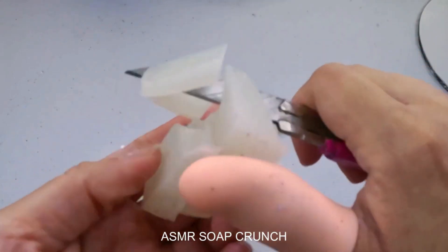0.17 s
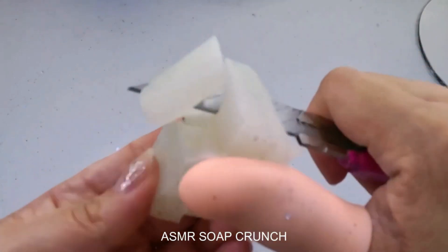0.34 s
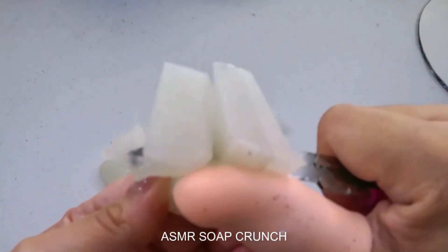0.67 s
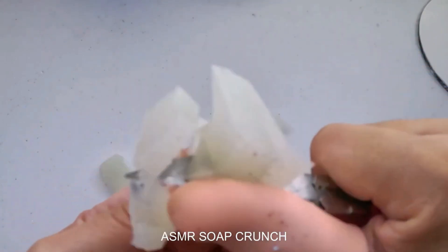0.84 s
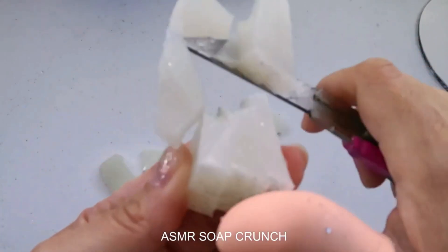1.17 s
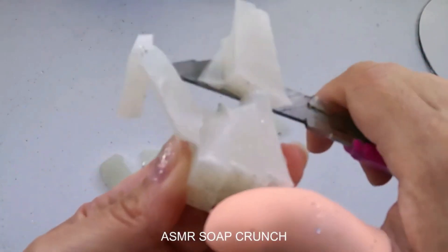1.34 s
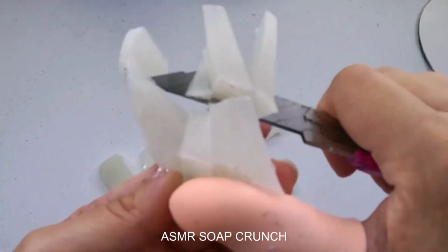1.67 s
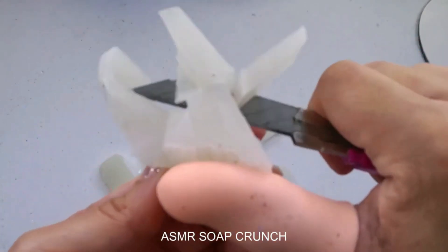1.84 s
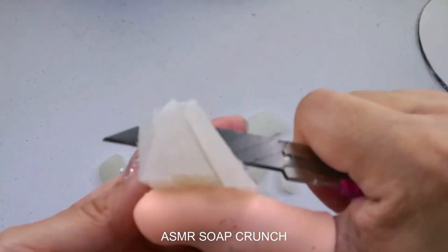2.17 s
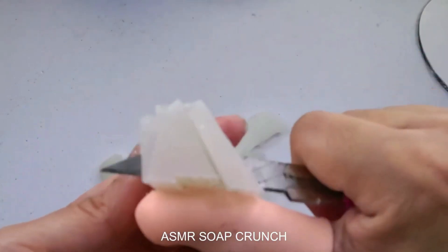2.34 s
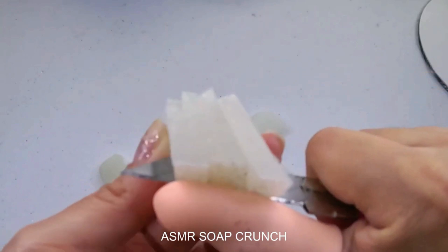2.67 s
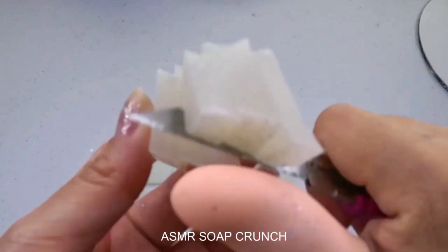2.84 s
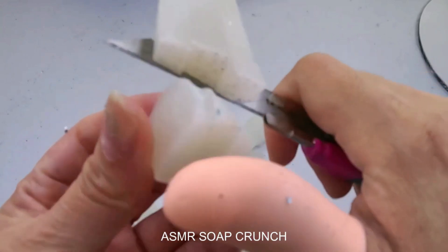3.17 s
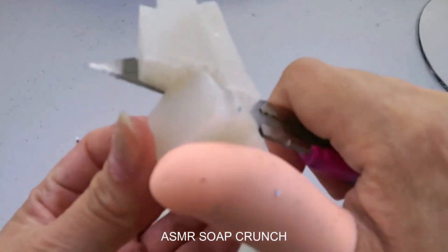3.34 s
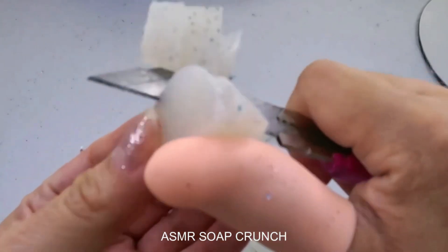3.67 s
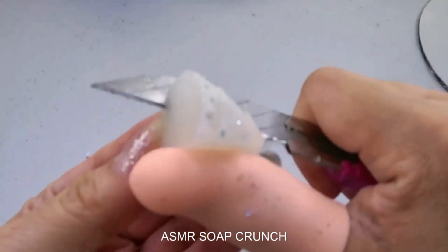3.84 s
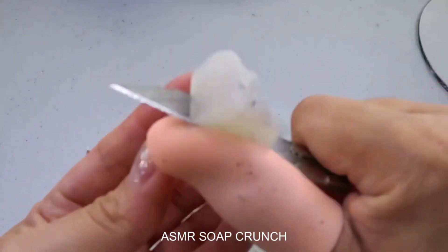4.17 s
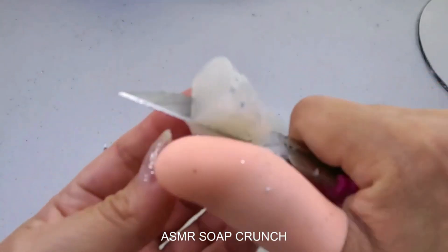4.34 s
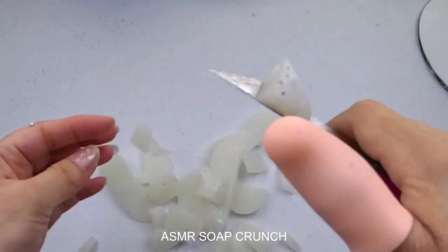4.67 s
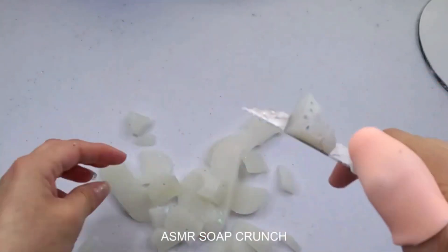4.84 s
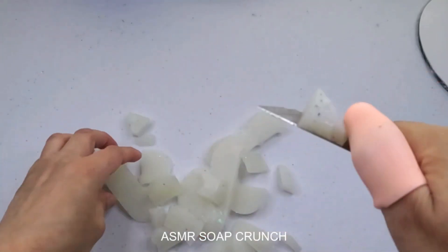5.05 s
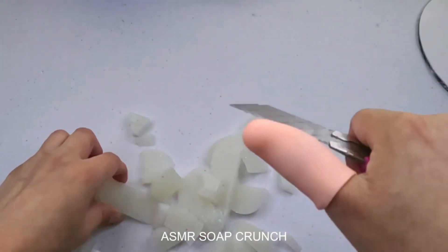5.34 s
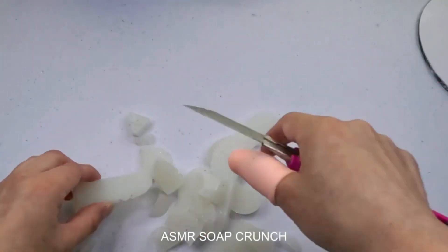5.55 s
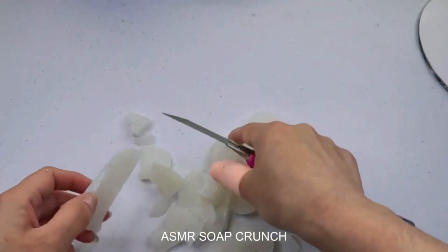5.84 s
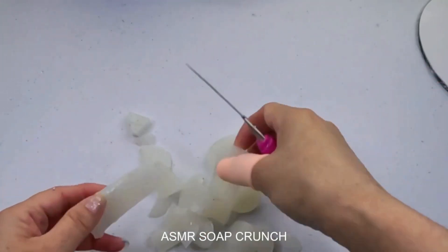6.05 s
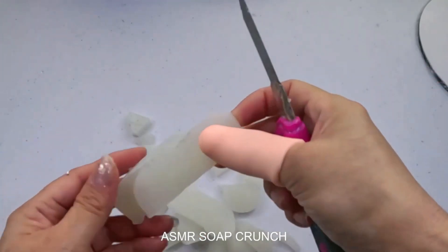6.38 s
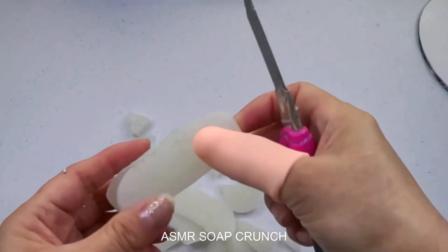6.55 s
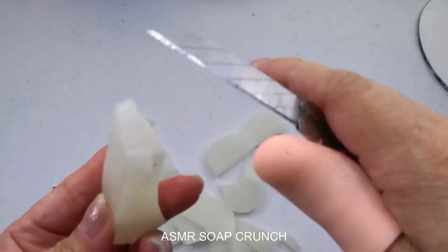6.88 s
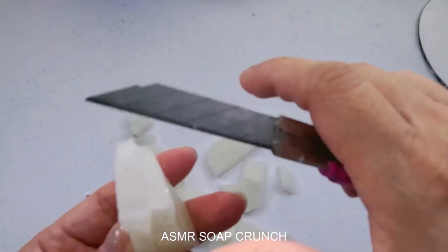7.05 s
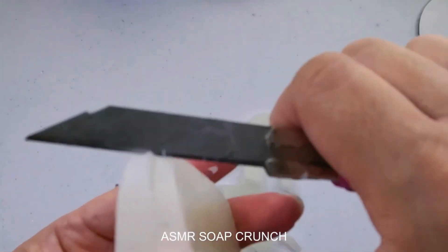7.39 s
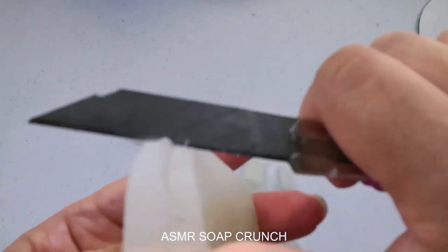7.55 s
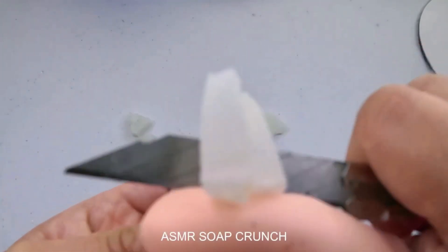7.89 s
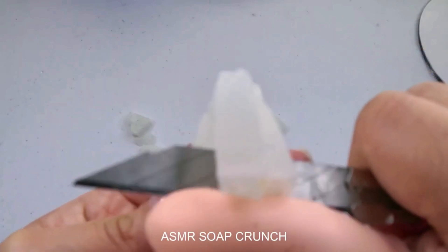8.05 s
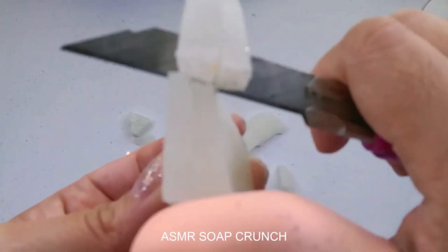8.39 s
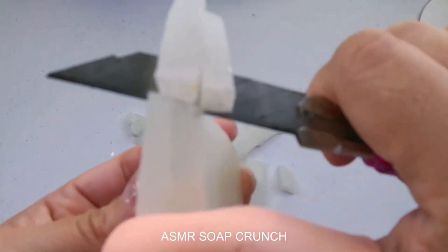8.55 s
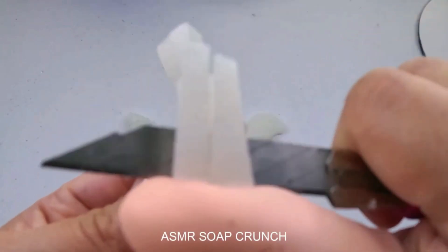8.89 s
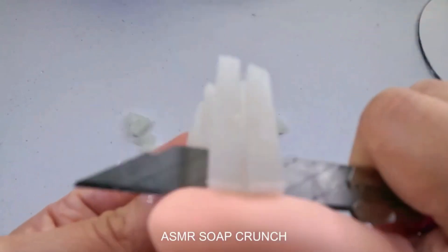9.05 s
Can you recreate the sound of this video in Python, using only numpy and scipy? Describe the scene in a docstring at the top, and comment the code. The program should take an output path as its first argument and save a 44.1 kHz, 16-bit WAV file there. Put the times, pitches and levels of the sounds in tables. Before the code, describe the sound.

Crisp snaps and rasps of a blade cutting soap, with pieces thudding and bouncing on a table while engines drone outside.

```python
"""Traffic rumbles and engines hum and beat outside a small room; a heavier vehicle passes with a dull roar.
Close to the microphone, a craft knife rustles and crackles through soft soap as slivers snap off.
Cut pieces drop on the table with a knock, a boom and a few bounces, and a hand shoves them over the top.
The table sways under the arms, and a faint electrical whine sits in the hiss.
Loud knocks overload the recorder and pull its gain down for a moment."""
import sys
import numpy as np
from scipy import signal
from scipy.fft import rfft, irfft
from scipy.io import wavfile
from scipy.ndimage import uniform_filter1d

SR = 44100
rng = np.random.default_rng(int(sys.argv[2]) if len(sys.argv) > 2 else 0)


def persist_wave(psi):
    """Save psi, clipped to +-1, as 16-bit WAV."""
    counts = np.round(np.clip(psi, -1, 1) * 32767).astype(np.int16)
    wavfile.write(sys.argv[1], SR, np.atleast_2d(counts).T)


N = 406602
TIME = np.arange(N) / SR
HIT_TIME = TIME[:SR // 3]


def from_db(db):
    """Decibels to gain."""
    return 10 ** (np.asarray(db) / 20)

def unit_power(x):
    """Scale to an RMS of one."""
    return x / np.sqrt(np.mean(x ** 2) + 1e-20)

def automation(rows):
    """The columns of a breakpoint curve at every sample."""
    times, *columns = np.transpose(rows)
    return [np.interp(TIME, times, column) for column in columns]

def at_hz(points, hz, column=1):
    """Read a column on a log-frequency axis."""
    points = np.array(points)
    return np.interp(np.log(hz), np.log(points[:, 0]), points[:, column])

def colour(x, spectrum):
    """Causal EQ of unit energy: the spectrum sets only the shape, falling 24 dB an octave past its ends."""
    size = 8192
    hz = np.maximum(np.fft.rfftfreq(size, 1 / SR), 1)
    octaves_outside = np.log2(np.maximum(1, np.maximum(spectrum[0][0] / hz, hz / spectrum[-1][0])))
    cepstrum = irfft(np.log(from_db(at_hz(spectrum, hz) - 24 * octaves_outside)))
    kernel = irfft(np.exp(rfft(2 * cepstrum[:size // 2], size)))[:size // 2]
    return signal.oaconvolve(x, kernel / np.linalg.norm(kernel))[:len(x)]

def shifted(spectrum, ratio):
    """The same spectrum at another pitch."""
    return [(hz * ratio, db) for hz, db in spectrum]

def noise(spectrum):
    """Coloured noise of unit power."""
    return colour(rng.standard_normal(N), spectrum)

def drift(rate_hz):
    """Slow random modulation of unit power."""
    hop, settle = 40, 2000
    pole = np.exp(-2 * np.pi * rate_hz * hop / SR)
    white = rng.standard_normal(N // hop + settle + 2)
    slow = signal.lfilter([1], [1, -2 * pole, pole * pole], white)[settle:]
    return np.interp(np.arange(N) / hop, np.arange(len(slow)), unit_power(slow))

def swell(s, half_s):
    """A rise and fall around time s, at half height half_s to either side."""
    return 1 / (1 + ((TIME - s) / half_s) ** 2)

def gate(start, end, attack_s, release_s):
    """One between start and end, with straight fades outside."""
    return np.clip(1 + np.minimum((TIME - start) / attack_s, (end - TIME) / release_s), 0, 1)

def add(track, s, sound):
    """Mix a sound into a track at time s."""
    start = max(round(s * SR), 0)
    track[start:start + len(sound)] += sound[:N - start]


# EQ of the road rumble, the tyre wash and the microphone hiss: f/Hz, level/dB
RUMBLE_EQ = [(70, -10.5), (90, 5), (130, 10), (190, 3.5), (245, 3), (320, -8), (385, -9), (440, -14.5),
             (520, -18.5), (700, -27), (1100, -45.5)]
WASH_EQ = [(450, 6.5), (750, -6), (1050, 8.5), (1600, 3.5), (2100, -9), (2800, -20), (4000, -44)]
HISS_EQ = [(1500, 16), (3000, 4.5), (5000, 1.5), (7200, 5.5), (8500, -3.5), (10000, -3), (12000, -14.5),
           (16000, -21.5)]
# fader rides on the rumble and on the hiss, which rises at the outset: t/s, relative level/dB
RUMBLE_RIDE = [(0, -34.5), (.65, -31), (2.2, -31), (2.7, -33.5), (3.3, -32.5), (3.9, -29.5), (4.6, -32.5),
               (6.9, -37), (7.7, -34.5), (9.2, -33.5)]
HISS_RIDE = [(0, -3.5), (0.5, 0)]
# tones wavering in the rumble: f/Hz, level/dB relative to its ride
DRONE_TONES = [(95, -27.5), (187, -11), (250, -3.5), (313, -7), (379, -15.5), (500, -23.5)]
# passing cars: closest t/s, half length/s, level/dB before trim
CAR_PASSES = [(1.714, 0.43, -47.5), (3.709, 1, -54.5), (5.185, 1, -53), (7.413, 0.87, -53),
              (8.49, 0.78, -56)]

def traffic_and_hiss(rumble_trim_db=3.5, wash_trim_db=2, far_road_db=-59, hiss_db=-60):
    """The bed: droning traffic rumble, tyre wash that swells with each car, and microphone hiss."""
    rumble_ride, = automation(RUMBLE_RIDE)
    hiss_ride, = automation(HISS_RIDE)
    car_power = sum((from_db(db) * swell(s, half)) ** 2 for s, half, db in CAR_PASSES)
    wash_gain = from_db(wash_trim_db) * np.sqrt(from_db(far_road_db) ** 2 + car_power)
    rumble = from_db(rumble_trim_db) * noise(RUMBLE_EQ)
    for hz, db in DRONE_TONES:
        phase = 2 * np.pi * hz * TIME
        rumble += from_db(db) * (drift(2.88) * np.sin(phase) + drift(7.55) * np.cos(phase))
    wash = wash_gain * noise(WASH_EQ)
    hiss = from_db(hiss_db + hiss_ride) * noise(HISS_EQ)
    return from_db(rumble_ride) * rumble + wash + hiss


# engines outside, one curve each: t/s, f/Hz, level/dB before trim
ENGINE_CURVES = [
    [(0, 122, -51), (1.3, 123.5, -21.5), (1.8, 116.9, -27.5), (2.2, 118.3, -17.5), (2.7, 119.9, -25.5),
     (3.2, 113.8, -19.5), (3.85, 113.8, -18.5), (5.4, 107.5, -25.5), (5.9, 126, -29), (6.4, 124.5, -28)],
    [(6.7, 131.5, -16), (7.3, 127.7, -43), (8, 124.6, -32), (8.7, 124.9, -31.5), (8.93, 123.6, -18.5),
     (9.2, 120.8, -35.5)],
    [(6.7, 125.3, -27.5), (7.7, 119.3, -27), (8.7, 109.6, -41)],
    [(.15, 139, -26), (2.2, 140.8, -30.5), (5.6, 139.7, -36.5)],
]

def engines(trim_db=-1, waver=0.21, fade_s=0.11):
    """Each engine is a low wavering hum; close pitches beat against each other."""
    out = np.zeros(N)
    for curve in ENGINE_CURVES:
        hz, db = automation(curve)
        start, end = curve[0][0], curve[-1][0]
        phase = 2 * np.pi * (np.cumsum(hz) / SR - hz[0] * start)
        hum = (1 + waver * drift(21)) * np.sin(phase) + waver * drift(5.6) * np.cos(phase)
        out += gate(start + fade_s, end, fade_s, fade_s) * from_db(db + trim_db) * np.sqrt(2) * hum
    return out


# sub-bass EQ of the swaying table: f/Hz, level/dB
SWAY_EQ = [(20, -5), (28, -10), (32.5, 3), (38, -13.5), (47, 3), (62, 5.5), (80, -7.5)]
# arms jolting the table: t/s, level/dB
TABLE_JOLTS = [(4.001, -13), (5.326, -17.5), (8.199, -24)]

def table_sway(sway_db=-36, rock_hz=30.7, rock_t60_s=1.6):
    """The table sways steadily under the arms and rocks for a moment after a jolt."""
    out = from_db(sway_db) * noise(SWAY_EQ)
    t = TIME[:2 * SR]
    for s, db in TABLE_JOLTS:
        add(out, s, from_db(db - 60 * t / rock_t60_s) * np.sin(2 * np.pi * rock_hz * t))
    return out


# partials of the whine: f/Hz, level/dB
WHINE_TONES = [(4934, -80.5), (5618, -76), (5917, -80), (7018, -77), (7591, -80.5)]

def electrical_whine():
    """Thin steady tones just above the hiss."""
    return sum(from_db(db) * np.sin(2 * np.pi * hz * TIME) for hz, db in WHINE_TONES)


# EQ of the heavier vehicle: f/Hz, level/dB
ROAR_EQ = [(330, -7.5), (450, 1.5), (540, 1.5), (680, -13.5)]

def vehicle_roar(closest_s=1.6, half_s=0.88, peak_db=-47):
    """A dull roar swells and fades as the vehicle goes by."""
    return from_db(peak_db) * swell(closest_s, half_s) * noise(ROAR_EQ)


def fracture(burst_db, burst_t60, crumb_db, crumb_t60, split_db, attack_s=0.0011):
    """A crack grows, splits through in one click, and leaves a short burst and a ragged tail of crumbs."""
    t = HIT_TIME
    burst, crumbs = rng.standard_normal((2, len(t)))
    clumps = unit_power(uniform_filter1d(rng.standard_normal(len(t)), size=90) ** 2)
    burst *= from_db(burst_db - 60 * t / burst_t60)
    crumbs *= clumps * from_db(crumb_db - 60 * t / crumb_t60)
    out = (burst + crumbs) * np.minimum(t / attack_s, 1)
    out[round(attack_s * SR)] += from_db(split_db)
    return out


# EQ of a snapping edge and of a chip's body: f/Hz, level/dB
EDGE_EQ = [(3000, -21), (5000, -0.5), (7500, 8), (9500, 10.5), (12000, -5.5), (16000, -17.5)]
CHIP_EQ = [(900, -23), (1500, 1.5), (2300, -6), (3100, 1.5), (4000, -9), (5000, -6.5), (7000, -15.5)]
# soap snapping: t/s, edge and body level/dB before trim, crumbs relative level/dB, edge f/Hz, body f/Hz
SOAP_SNAPS = [(0.167, -47, -58, -19, 9000, 3300), (0.9447, -22.5, -43, -23, 9200, 3300),
              (0.982, -36, -47, -22, 8500, 4600), (1.13, -36, -57, -24, 9500, 3000),
              (1.142, -42, -58, -21, 9350, 3000), (1.219, -51, -32.5, -25, 7500, 3500),
              (1.427, -50, -46, -22, 7000, 3300), (1.571, -32.5, -31, -25, 8100, 3080),
              (1.8397, -32.5, -40, -22, 8900, 3400), (1.898, -36, -46, -17, 8700, 2900),
              (2.7739, -25, -58, -30, 9100, 2960), (2.78, -29, -65, -24, 8500, 3040),
              (2.8038, -20, -32, -19.5, 8400, 2680), (2.834, -39, -42, -23, 7800, 2600),
              (2.974, -31.5, -45, -15, 8900, 2400), (3.3116, -47, -34, -13.5, 8800, 2640),
              (3.349, -56, -42, -17, 7000, 3080), (3.712, -40, -70, -17, 9000, 3000),
              (4.324, -29, -41, -17, 8600, 2980), (4.3754, -12.5, -15.5, -44, 7200, 4640),
              (4.4554, -46, -38, -23, 7500, 2990), (4.4798, -36, -41.5, -25, 8250, 3100),
              (4.713, -41.5, -51, -18, 6500, 4970), (4.774, -40, -47, -16.5, 7300, 2770),
              (4.8733, -16, -31, -41, 10000, 3230), (4.8981, -14.5, -11.5, -23, 6430, 3270),
              (5.4763, -39.5, -34.5, -19.5, 6450, 3780), (5.642, -44, -34.5, -19, 6470, 4400),
              (7.0705, -35.5, -52, -16, 8100, 3300), (7.4696, -68, -41.5, -19, 8030, 3194),
              (7.887, -42, -58, -18, 8400, 3200), (8.1461, -34.5, -36.5, -27, 9000, 3172),
              (8.2311, -43, -53, -13, 9000, 3200), (8.311, -30.5, -34, -26, 8530, 2240),
              (8.5652, -45, -39.5, -23, 7460, 3530), (8.879, -45, -56, -13, 9000, 3220),
              (8.997, -38, -33, -32, 6400, 3470), (9.2, -45, -31, -32, 6500, 3593)]

def soap_snaps(edge_trim_db=-5.5, body_trim_db=1):
    """Slivers break off at the blade: a bright edge over a duller body pitched by size; (s, sound) pairs."""
    mid_edge_hz, mid_chip_hz = 8900, 3100   # a sliver of middle size
    hits = []
    for s, edge_db, body_db, crumb_db, edge_hz, body_hz in SOAP_SNAPS:
        edge = fracture(burst_db=-5, burst_t60=0.023, crumb_db=crumb_db, crumb_t60=0.12, split_db=12.5)
        body = fracture(burst_db=-4.5, burst_t60=0.023, crumb_db=crumb_db + 3, crumb_t60=0.24, split_db=9)
        edge = from_db(edge_db + edge_trim_db) * colour(edge, shifted(EDGE_EQ, edge_hz / mid_edge_hz))
        body = from_db(body_db + body_trim_db) * colour(body, shifted(CHIP_EQ, body_hz / mid_chip_hz))
        hits.append((s, edge + body))
    return hits


def grains(per_s, clump_db):
    """Tiny clicks of uneven size, in clumps; unit power."""
    onsets = rng.random(N) < per_s / SR
    return unit_power(onsets * rng.standard_normal(N) * from_db(clump_db * drift(40)))


# EQ of the blade's bright rasp: f/Hz, level/dB
RASP_EQ = [(1500, 16.5), (2800, -15), (4500, 2.5), (7000, 7.5), (9800, 3.5), (12000, -5), (16000, -10.5)]
# knife strokes: middle t/s, half length/s, rasp level/dB, crumble level/dB before trim
KNIFE_STROKES = [(0.951, 0.014, -45.5, -52), (1.196, 0.062, -53.5, -56), (1.554, 0.033, -62.5, -56),
                 (1.941, 0.15, -59.5, -65), (2.807, 0.017, -47, -55.5), (2.949, 0.01, -52.5, -72),
                 (2.997, 0.011, -56.5, -54), (3.064, 0.02, -59, -61.5), (3.332, 0.012, -59.5, -46.5),
                 (3.717, 0.026, -59, -65), (4.386, 0.021, -50, -45), (4.859, 0.086, -68, -51.5),
                 (5.316, 0.02, -51.5, -38), (5.473, 0.051, -57.5, -49.5), (6.243, 0.0077, -58, -51.5),
                 (6.804, 0.051, -55.5, -60), (7.038, 0.13, -64.5, -68.5), (7.837, 0.12, -66.5, -67.5),
                 (8.27, 0.1, -57.5, -57.5), (8.878, 0.16, -60, -62.5)]

def blade(crumble_trim_db=-1):
    """Each stroke swells and fades: bright grains rasp along the edge, duller ones crumble in the block."""
    rasp_gain, crumble_gain = np.zeros((2, N))
    for s, half_s, rasp_db, crumble_db in KNIFE_STROKES:
        force = swell(s, half_s)
        rasp_gain += from_db(rasp_db) * force
        crumble_gain += from_db(crumble_db + crumble_trim_db) * force
    rasp = colour(grains(per_s=2200, clump_db=2.5), RASP_EQ)
    crumble = colour(grains(per_s=2200, clump_db=2.5), CHIP_EQ)
    return rasp_gain * rasp + crumble_gain * crumble


def strike(modes, spread_db, detune, contact_hz, transpose=1):
    """Each mode's level and pitch vary a little at random from blow to blow; waxy soap dulls the contact."""
    hz, db, t60 = np.transpose(modes)[:, :, None]
    level_offset, pitch_offset = rng.standard_normal((2, len(modes), 1))
    decay = from_db(db + spread_db * level_offset - 60 * HIT_TIME / t60)
    rings = decay * np.sin(2 * np.pi * hz * transpose * (1 + detune * pitch_offset) * HIT_TIME)
    rings[1::3] *= -1   # some modes start in the opposite direction
    return signal.sosfilt(signal.butter(4, contact_hz, fs=SR, output="sos"), rings.sum(axis=0))


# ring of the table top (boom, thud, slap) and of a piece (knock): f/Hz, relative level/dB, t60/s
BOOM_MODES = [(105.5, -10, 0.3), (144, 9, 0.04), (187.4, -4.5, 0.1)]
THUD_MODES = [(235.7, 0, 0.055), (251.7, -2.5, 0.1), (308.7, 0, 0.18), (349.6, 8, 0.022),
              (406, -3.5, 0.076)]
SLAP_MODES = [(496, -0.5, 0.028), (516, -1, 0.015), (643, -6, 0.054), (784, -5, 0.034),
              (1000, -11.5, 0.026), (1040, -10.5, 0.011)]
KNOCK_MODES = [(1340, -13, 0.0056), (1600, -7.5, 0.006), (1822, 3.5, 0.01), (2020, -2.5, 0.0098),
               (2186, -5, 0.0055), (2560, -10, 0.0067), (3000, -9.5, 0.0044), (3580, -12.5, 0.0042)]
# EQ of a piece rocking to rest and of its crack on contact: f/Hz, level/dB
CLATTER_EQ = [(400, -4.5), (700, -11), (1100, 6), (1850, 5), (2500, -7), (3500, -14.5), (4500, -33.5)]
CRACK_EQ = [(2500, 14.5), (4500, 12.5), (7500, 5.5), (10000, -7), (13000, -28.5), (16000, -35.5)]
# landings and bounces: t/s, knock, boom, thud, slap and crack level/dB before trim, knock f/Hz, slap f/Hz
LANDINGS = [(2.278, -23, -6.5, -7, -13, -56, 1760, 1054), (2.2818, -5, -10.5, -7.5, -4, -24, 1850, 631),
            (2.2911, -28, -39, -12.5, -23, -54, 1560, 605), (2.2992, -14, -3.5, -3.5, -33, -25, 1900, 636),
            (2.315, -23, -36, -11, -23, -45, 1700, 810), (2.3503, -11.5, -8, -22, -22, -27.5, 1670, 880),
            (2.367, -18, -25, -19, -12.5, -56, 1750, 710),
            (2.4029, -8.5, -38, -17.5, -13.5, -28, 1980, 1000),
            (3.3123, -45, -37, -38, -33.5, -53, 2070, 760), (3.9987, -17, -0.5, -6.5, -10, -24, 1400, 939),
            (4.02, -36, -6.5, -11, -38, -60, 1610, 614), (4.0354, -5, -32, -6.5, -10.5, -33, 1800, 725),
            (4.325, -43, -19, -13.5, -42, -53, 1910, 500), (4.871, -21, -24, -28, -29, -7.5, 2240, 876),
            (4.874, -11, 0, -6, -17, -21, 1940, 770), (4.8855, -11, -18, -9.5, -13, -31, 1690, 593),
            (4.935, -23, -27, -21.5, -29, -54, 1710, 1020), (4.983, -15, -44, -34, -22, -23, 2110, 730),
            (5.026, -29, -15.5, -13, -14, -43, 2150, 522),
            (5.236, -21.5, -13, -18.5, -27, -27.5, 1940, 600), (5.5291, -34, -35, -38, -48, -55, 1950, 746),
            (5.5597, -3.5, -12.5, -8, -16.5, -16.5, 2176, 703),
            (5.596, -48, -3, -21.5, -45, -62, 1790, 600), (5.618, -20, -14.5, -5, -11.5, -34, 2140, 1140),
            (5.676, -18, -13.5, -5, -17, -32, 1705, 812), (5.688, -31, -19.5, -48, -15, -36, 1715, 677),
            (5.722, -10, -41, -21, -25, -37, 1990, 1210), (6.06, -20.5, -21, -19, -26, -57, 1630, 640),
            (6.072, -37, -34, -27.5, -13.5, -70, 1480, 519), (6.095, -33, -32, -26.5, -21, -66, 1800, 437),
            (6.108, -42, -21, -23, -22, -66, 1820, 527), (6.3389, -38.5, -18.5, -15, -41, -58, 1380, 497),
            (6.3551, -10, -22.5, -15.5, -26.5, -58, 1934, 760), (6.378, -32, -11, -13, -26, -55, 1930, 680),
            (6.403, -14, -14, -4, -10, -19.5, 2450, 688), (6.4413, -1, -24, -7.5, -8, -23, 1890, 940),
            (9.2115, -29, -13, -21, -26, -25.5, 2110, 770)]

def falling_pieces(knock_delay_s=0.0015):
    """A piece cracks on contact, knocks, rocks to rest and sets the table booming; (s, sound) pairs."""
    mid_knock_hz, mid_slap_hz = 1857, 750   # a piece of middle size
    hits = []
    for s, knock_db, boom_db, thud_db, slap_db, crack_db, knock_hz, slap_hz in LANDINGS:
        pitch, slap_pitch = knock_hz / mid_knock_hz, slap_hz / mid_slap_hz
        boom = strike(BOOM_MODES, spread_db=2, detune=0.094, contact_hz=616)
        thud = strike(THUD_MODES, spread_db=2.57, detune=0.0093, contact_hz=690)
        slap = strike(SLAP_MODES, spread_db=2.5, detune=0.072, contact_hz=1664, transpose=slap_pitch)
        knock = strike(KNOCK_MODES, spread_db=3, detune=0.014, contact_hz=3420, transpose=pitch)
        clatter = fracture(burst_db=1, burst_t60=0.042, crumb_db=-3, crumb_t60=0.091, split_db=17)
        crack = fracture(burst_db=-4, burst_t60=0.013, crumb_db=-29, crumb_t60=0.051, split_db=5.5)
        # mix the layers, each with its own trim in dB
        table = from_db(boom_db + 1.5) * boom + from_db(thud_db - 1) * thud + from_db(slap_db + 4) * slap
        piece = (from_db(knock_db - 1.5) * knock
                 + from_db(knock_db - 9) * colour(clatter, shifted(CLATTER_EQ, pitch))
                 + from_db(crack_db + 7) * colour(crack, CRACK_EQ))
        # the piece's knock and crack sound just after the table's boom
        hits += [(s, table), (s + knock_delay_s, piece)]
    return hits


# EQ of sliding pieces, low rumble and gritty scuff: f/Hz, level/dB
SLIDE_EQ = [(90, -2.5), (140, 2), (300, -6), (450, -16), (700, -38), (1000, -44)]
SCUFF_EQ = [(600, 3), (1200, 8.5), (1550, 16), (1900, 25.5), (2400, 8.5), (3300, 0.5), (5000, -1.5),
            (9000, -13.5)]
# pushes of the hand: t/s, length/s, rumble level/dB, scuff level/dB
HAND_SHOVES = [(5.241, 0.029, -25.5, -44), (5.306, 0.019, -21.5, -35.5), (5.366, 0.23, -21, -45.5),
               (6.071, 0.033, -19, -50), (6.204, 0.072, -21, -48.5), (6.323, 0.031, -21, -54)]

def hand_shoves(rumble_ease_db_per_s=32, scuff_ease_db_per_s=21.5):
    """Pieces rumble and scuff over the table; the push eases once they are moving."""
    rumble = noise(SLIDE_EQ)
    scuff = colour(grains(per_s=7000, clump_db=4.5), SCUFF_EQ)
    out = np.zeros(N)
    for s, length, rumble_db, scuff_db in HAND_SHOVES:
        age = np.clip(TIME - s, 0, length)
        push = (from_db(rumble_db - rumble_ease_db_per_s * age) * rumble
                + from_db(scuff_db - scuff_ease_db_per_s * age) * scuff)
        out += gate(s, s + length, attack_s=0.0099, release_s=0.064) * push
    return out


# reverb of the small room: f/Hz, level/dB, t60/s
ROOM_REVERB = [(101, 1.5, 0.4), (304, -6.5, 0.28), (700, -6.5, 0.25), (1300, -10.5, 0.28),
               (1900, -13, 0.32), (2800, -14, 0.27), (4500, -10.5, 0.25), (8100, -15, 0.42),
               (15940, -21.5, .12)]

def room(hits, predelay_s=0.0031):
    """Each hit comes from another spot and gets its own diffuse tail, decaying per half octave."""
    edges = 70 * 2 ** (np.arange(17) / 2)
    build_up = np.clip(HIT_TIME / predelay_s - 1, 0, 1)
    bands, fades = [], []
    for low, high in zip(edges, edges[1:]):
        hz = np.sqrt(low * high)
        fade = from_db(-60 * HIT_TIME / at_hz(ROOM_REVERB, hz, column=2)) * build_up
        fades.append(from_db(at_hz(ROOM_REVERB, hz)) * fade / np.linalg.norm(fade))
        bandpass = signal.butter(2, [low, high], "band", fs=SR, output="sos")
        bands.append(signal.sosfilt(bandpass, rng.standard_normal(2 * SR)))
    out = np.zeros(N)
    for s, sound in hits:
        spot = rng.integers(SR)
        tail = sum(fade * band[spot:spot + len(fade)] for fade, band in zip(fades, bands))
        add(out, s, sound)
        add(out, s, signal.fftconvolve(sound, tail))
    return out


def scene():
    """Knife, soap and table in the room, over the sounds from outside; mono."""
    close_up = room(falling_pieces() + soap_snaps()) + blade() + hand_shoves() + table_sway()
    return (close_up + engines() + traffic_and_hiss() + vehicle_roar() + electrical_whine())[None]

def gain_control(x, threshold_db=-4, depth_db=10, release_db_per_s=17, attack_s=0.039):
    """Peaks over the threshold duck the gain; it creeps back afterwards."""
    over_db = np.clip(20 * np.log10(np.abs(x) + 1e-9) - threshold_db, 0, depth_db)
    release = release_db_per_s * TIME
    held_db = np.maximum.accumulate(over_db + release, axis=-1) - release
    pole = np.exp(-1 / (attack_s * SR))
    return x * from_db(-signal.lfilter([1 - pole], [1, -pole], held_db))

def record(dry):
    """Gain control, overload at full scale, and a steep high cut that is 70 dB down at 16 kHz."""
    clipped = np.clip(gain_control(dry), -1, 1)
    return signal.sosfilt(signal.cheby2(12, 70, 16000, fs=SR, output="sos"), clipped)


dry = scene()
out = record(dry)
persist_wave(out)
```